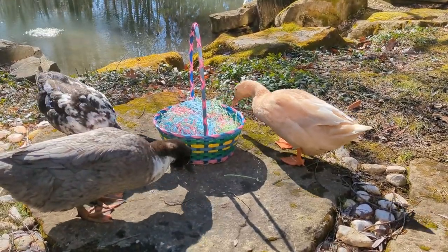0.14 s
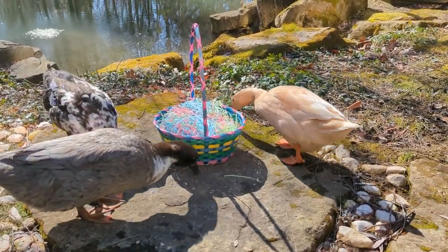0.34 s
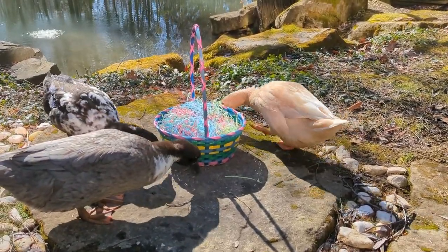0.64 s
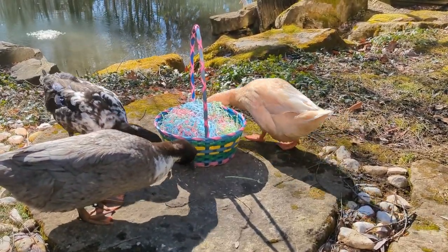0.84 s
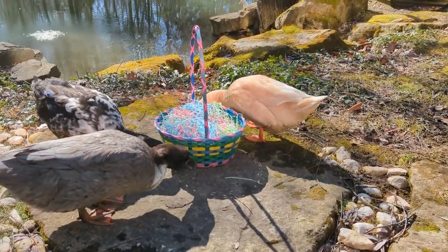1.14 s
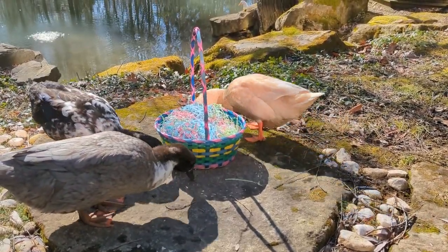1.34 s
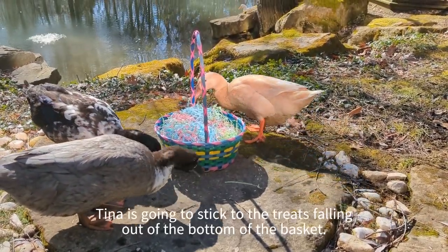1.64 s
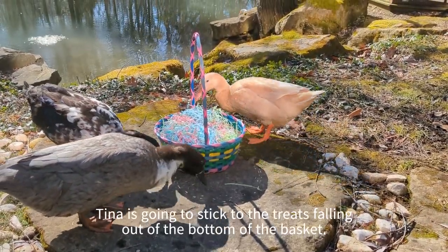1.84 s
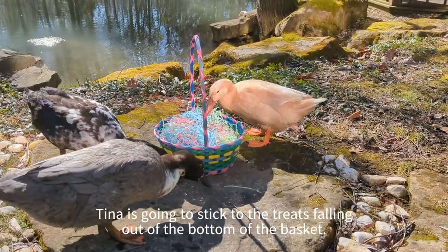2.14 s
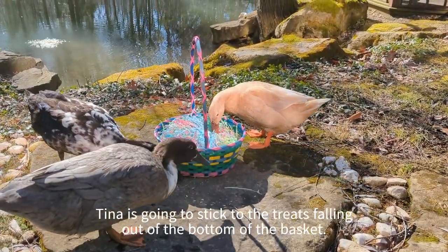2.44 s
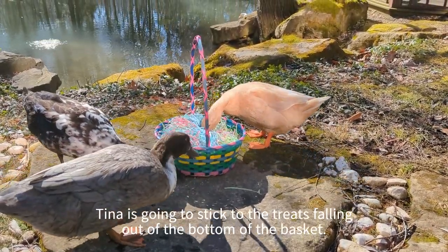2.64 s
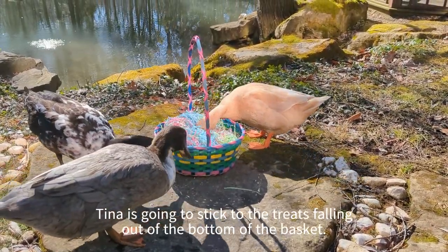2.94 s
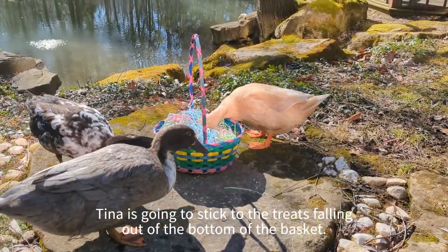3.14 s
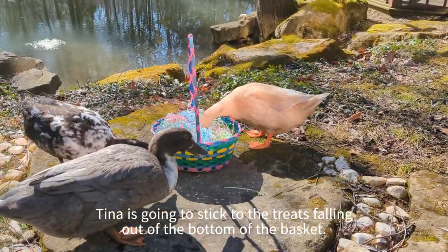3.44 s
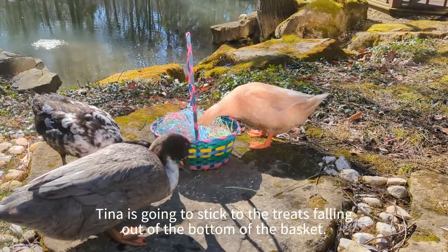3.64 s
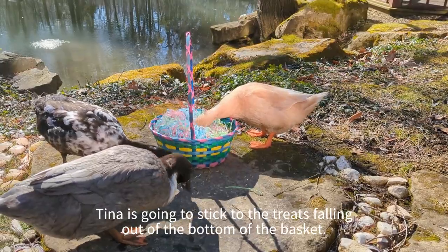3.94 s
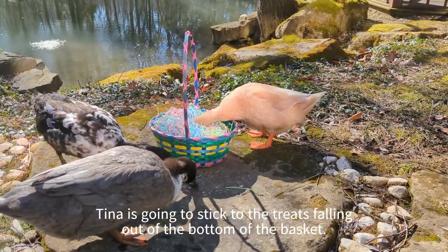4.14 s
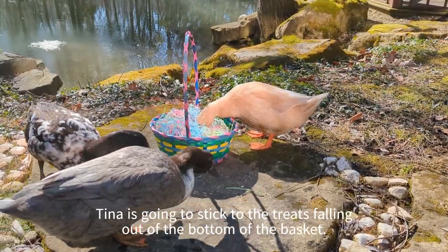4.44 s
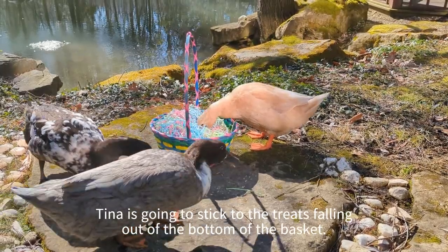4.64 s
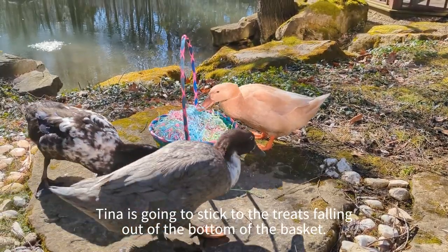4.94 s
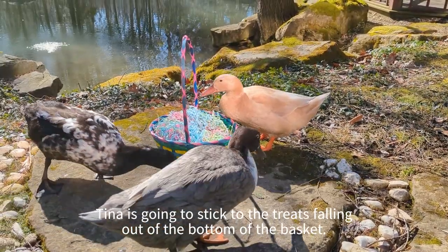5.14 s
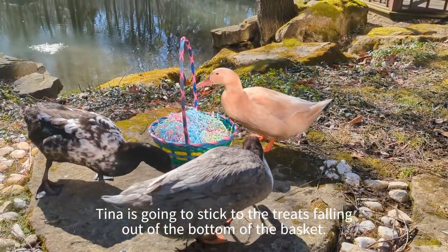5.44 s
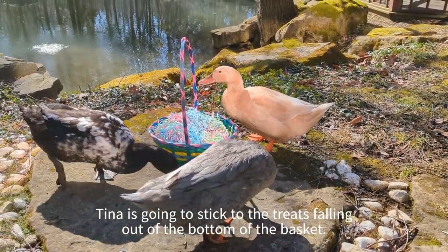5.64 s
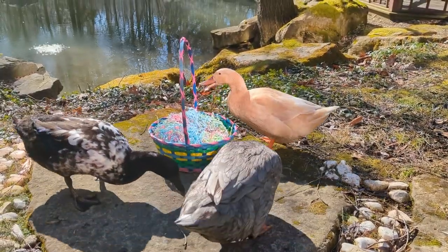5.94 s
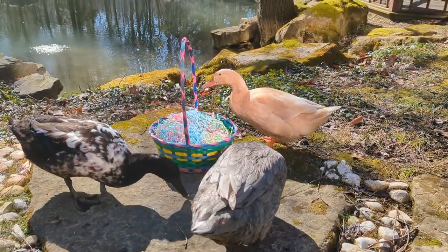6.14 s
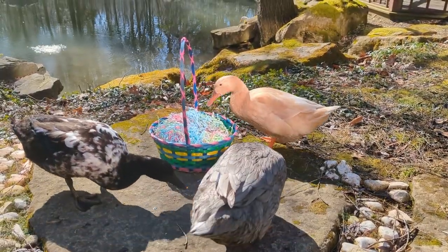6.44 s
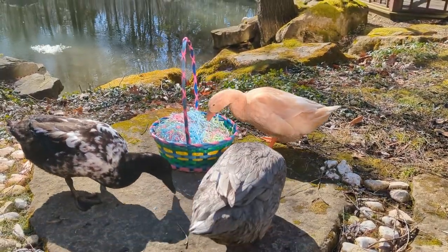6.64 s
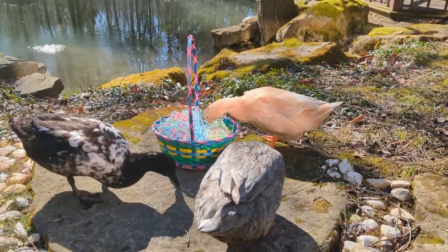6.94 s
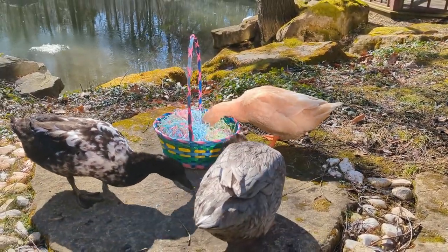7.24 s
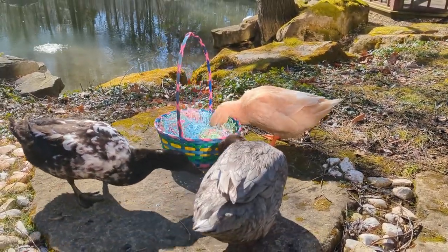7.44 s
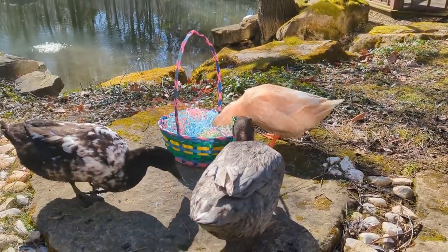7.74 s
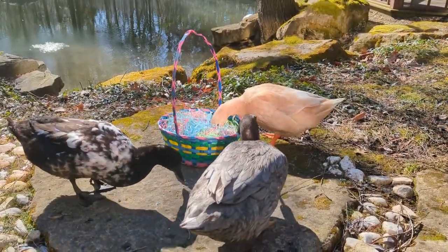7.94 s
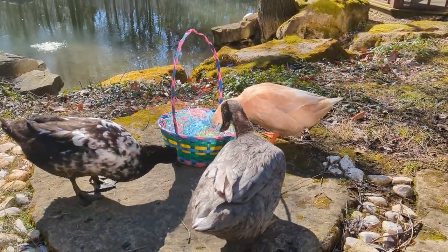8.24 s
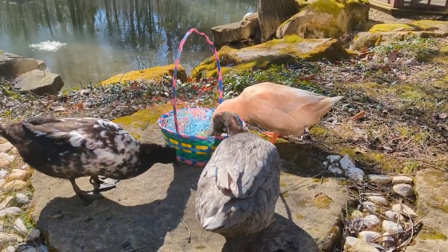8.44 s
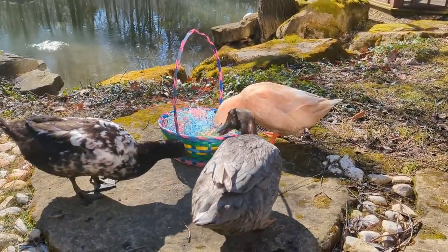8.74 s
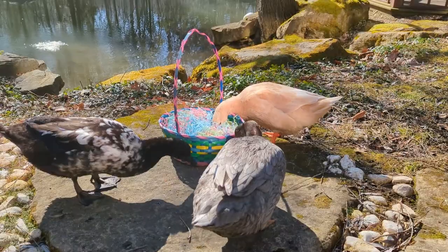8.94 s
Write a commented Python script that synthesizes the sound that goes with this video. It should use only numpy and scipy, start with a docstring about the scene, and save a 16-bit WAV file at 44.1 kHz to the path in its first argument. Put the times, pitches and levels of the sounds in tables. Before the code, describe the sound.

Dry, crackly rustle of plastic strands under nibbling duck bills, small taps, soft brief duck calls, and a distant engine drone outdoors.

```python
"""Shredded plastic grass rustles and snaps at once under the bills of three ducks feeding from a basket by a pond.
A far engine drones and a pump hums; bills tap basket and stone; a few soft peeps and quacks slip out.
Late on, something scuffs and knocks twice close to the right microphone port.
Friction and cracks are shaped noise with random slips; taps, calls and motors are sines with noise or wavering.
The two ports colour the treble differently: the right one favours 5 kHz, the left one 12 kHz."""
import sys
import numpy as np
from scipy import signal
from scipy.fft import rfft, irfft, next_fast_len
from scipy.io import wavfile
from scipy.ndimage import uniform_filter1d

SR = 44100
rng = np.random.default_rng(int(sys.argv[2]) if len(sys.argv) > 2 else 0)


def unload_wav(signal):
    """Save mono or channel-first audio to the path in sys.argv[1] as 16-bit WAV at rate SR, clipped to [-1, 1]."""
    wavfile.write(
        sys.argv[1],
        SR,
        np.round(np.clip(np.atleast_2d(signal).T, -1, 1) * 32767).astype(np.int16),
    )


N = 400869

# spectral weight of the rubbing strands: f/Hz, relative density level/dB
STRAND_SPECTRUM = [(410, -33), (700, 7), (1000, -18), (1140, -17), (1470, -1), (1770, -20), (1910, -13),
                   (3470, -11), (5020, -5), (5960, -17.5), (8190, -18), (9850, -22), (12200, -11),
                   (15900, -24.5), (16500, -47)]


def amp(db):
    """A level in dB is twenty times the logarithm of an amplitude ratio; this inverts it."""
    return 10 ** (np.asarray(db) / 20)


def rms_one(x):
    """Division by the root mean square brings a signal to unit effective value."""
    return x / np.sqrt(np.mean(x ** 2) + 1e-20)


def in_time(rows):
    """Linear interpolation turns rows of times and values into continuous courses."""
    s, *columns = np.transpose(rows)
    return [np.interp(np.arange(N) / SR, s, c) for c in columns]


def at_hz(points, hz):
    """A spectral level is interpolated along logarithmic frequency."""
    points = np.array(points)
    return np.interp(np.log(hz), np.log(points[:, 0]), points[:, 1])


def coloured(x, gain):
    """Linear filtering: the spectrum is multiplied by gain(Hz)."""
    size = next_fast_len(x.shape[-1])
    hz = np.arange(size // 2 + 1) * SR / size + 1
    return irfft(rfft(x, size) * gain(hz), size)[..., :x.shape[-1]]


def drift(rate):
    """Random modulation: noise low-passed around rate (Hz), with effective value 1."""
    step = 32   # samples between the computed points
    size = next_fast_len(N // step + 2)
    hz = np.arange(size // 2 + 1) * SR / step / size
    slow = irfft(rfft(rng.standard_normal(size)) / (1 + (hz / rate) ** 2), size)
    return np.interp(np.arange(N) / step, np.arange(size), rms_one(slow))


def fading(x, t60):
    """Exponential decay: each impulse rises suddenly and falls by 60 dB in t60 seconds."""
    return signal.lfilter([1], [1, -amp(-60 / (t60 * SR))], x + 1e-18)


def stereo_noise(alike):
    """Correlated noise: mid and side are mixed so that the two channels correlate by alike."""
    mid, side = rng.standard_normal((2, N))
    return np.sqrt((1 + alike) / 2) * mid + np.sqrt((1 - alike) / 2) * side * [[1], [-1]]


def crackle(per_s, spread_db, t60):
    """Stick-slip friction: an envelope of many small decaying slips of uneven size, with effective value 1."""
    sizes = amp(spread_db * np.minimum(rng.exponential(1, N), 3))
    slips = (rng.random(N) < per_s / SR) * sizes
    return rms_one(fading(slips, t60))


def bites():
    """Superposed power: each bill closing on the strands adds a rounded hump to the swell in dB."""
    # t/s, swell level/dB; values below zero add none
    bite_times = [(0.031, 12.5), (0.196, 19.5), (0.437, 5.5), (0.579, 7), (0.69, 7), (0.943, 14),
                  (1.044, 14.5), (1.13, 10), (1.362, 10), (1.654, 12), (1.731, 11), (1.852, 9), (1.946, 4),
                  (2.235, 7.5), (2.527, 7), (3.335, 1), (3.405, 2.5), (3.491, 5), (3.637, 6), (3.702, 8),
                  (3.789, 9.5), (3.834, 6.5), (3.939, 4), (4.304, 1), (4.421, -1), (4.654, 4.5), (4.714, 0),
                  (4.995, 10), (5.117, 6), (5.205, 7), (5.319, 12.5), (5.373, 6.5), (6.1, 9.5), (6.161, 10),
                  (6.404, 12), (6.68, 9), (6.758, 6.5), (6.853, 7), (7.039, 7), (7.195, 4.5), (7.321, 7.5),
                  (7.545, 6.5), (7.684, 6), (7.881, 6), (8.09, 7), (8.311, 8), (8.646, 10)]
    half_width_s = 0.012
    t = np.arange(0, N, 32) / SR
    power = 1
    for s, db in bite_times:
        power = power + (amp(2 * max(db, 0)) - 1) * np.exp(-((t - s) / half_width_s) ** 2)
    return np.interp(np.arange(N) / SR, t, 10 * np.log10(power))


def grains():
    """Narrow-band scratching: single strands scratch in clumps, each dealt to one of ten bands; effective value 1."""
    typical_per_s, clump_db, t60_s = 160, 8, 0.049
    born = rng.random(N) < typical_per_s * amp(clump_db * drift(7)) / SR
    ticks = born * amp(3.9 * np.minimum(rng.exponential(1, N), 3))
    dealt, white, out = rng.integers(0, 10, N), rng.standard_normal(N), 0
    for k, hz in enumerate(np.geomspace(2800, 5300, 10)):
        band = signal.butter(2, [hz / 1.035, hz * 1.035], "band", fs=SR, output="sos")
        out = out + signal.sosfilt(band, white * fading(ticks * (dealt == k), t60_s))
    return rms_one(out)


def stirring():
    """Friction noise: strands rub in uneven slips, a fine hiss above rustle and crunch that swell apart."""
    # t/s, fine hiss level/dB, level/dB of the low crunch, which drops out when the stirring is faint;
    # both before the swings
    stir_course = [(0.0, -57, -73), (0.38, -53.5, -102), (0.63, -58, -91.5), (2.17, -53, -76.5),
                   (2.63, -54.5, -86), (3.01, -46.5, -73.5), (3.21, -44.5, -61), (3.52, -44, -59),
                   (4.4, -42, -55), (4.58, -45, -61), (4.76, -49, -69), (4.98, -54.5, -84.5),
                   (5.49, -62, -108), (5.85, -60, -108), (6.86, -63, -100.5), (7.24, -50, -72),
                   (7.47, -44.5, -65), (7.74, -42.5, -54.5), (8.05, -49, -68.5), (9.09, -53, -77.5)]
    # bands below the hiss: lower f/Hz, upper f/Hz, share that follows the crunch,
    # gain level/dB, patchiness level/dB, depth of the bites (factor on their dB)
    stir_layers = [(2715, 3990, 0.34, -9.5, 7, 1.6), (1659, 2494, 1.25, -1, 3, 1.39),
                   (985, 1570, 1.555, -7.5, 10.5, 1.48)]
    nibble_s = .16   # bills work in short bouts: swings slower than this are evened out
    bout_db, sparse_bout_db_per_db = 0.77, 0.0219   # swing of the bouts; widens as the crunch thins out
    tick_share, sparse_tick_db_per_db = .22, 0.2872   # dry ticks stand out as the crunch thins out
    grain_db = -10.5   # scratches against the hiss
    hiss_db, crunch_db = in_time(stir_course)
    sparse_db = crunch_db.max() - crunch_db

    throb = drift(9.4)
    throb = np.minimum(rms_one(throb - uniform_filter1d(throb, int(nibble_s * SR))), 1.2)
    throb *= bout_db + sparse_bout_db_per_db * sparse_db

    fine = crackle(1200, 8.7, 0.069)
    ticks = tick_share * amp(sparse_tick_db_per_db * np.minimum(sparse_db, 28)) * crackle(90, 4.5, .011)
    slips = (fine + ticks) * stereo_noise(0.016)
    slips = coloured(slips, lambda hz: amp(at_hz(STRAND_SPECTRUM, hz)))

    hiss = signal.sosfilt(signal.butter(10, 4350, "high", fs=SR, output="sos"), slips)
    swell = bites()
    out = (rms_one(hiss) + amp(grain_db) * grains()) * amp(hiss_db + throb + swell)
    for low_hz, high_hz, share, gain_db, patchy_db, depth in stir_layers:
        edges = np.geomspace(low_hz, high_hz, 3)
        for band in zip(edges, edges[1:]):
            part = signal.sosfilt(signal.butter(3, band, "band", fs=SR, output="sos"), slips)
            level_db = gain_db + hiss_db + share * (crunch_db - hiss_db)
            patches = patchy_db * np.minimum(drift(12), .6)
            out += rms_one(part) * amp(level_db + throb + depth * swell + patches)
    return out


def background():
    """Stationary noise and tones: air hiss rises with the rumble, an engine drone wavers, a pump tone holds steady."""
    # far engine: t/s, mean drone f/Hz, drone level/dB before wavering, rumble level/dB
    engine_course = [(0.0, 120, -77.5, -78), (0.71, 113.6, -84.5, -95), (1.52, 113.4, -78, -79),
                     (3.42, 114.9, -84.5, -91), (4.93, 112.9, -71.5, -79.5), (8.58, 111.1, -71.5, -71),
                     (9.09, 111.4, -66.5, -68)]
    # open air: f/Hz, relative density level/dB
    air_spectrum = [(15, -44), (25, -56), (112, 5), (132, 4.5), (260, -4), (306, -4.5), (366, -6.5),
                    (466, -10.5), (592, -5), (784, -5), (1240, -10), (2220, -14.5), (3000, -28),
                    (3900, -22), (6600, -120)]
    air_db = -77   # when the rumble is at -79 dB
    pump_hz, pump_db = 360.4, -83.5
    hz, drone_db, rumble_db = in_time(engine_course)
    air = rms_one(coloured(stereo_noise(0.54), lambda f: amp(at_hz(air_spectrum, f))))
    air = amp(air_db + 0.42 * (rumble_db + 79)) * air
    turn = 2 * np.pi * np.cumsum(hz * (1 + .045 * drift(9))) / SR
    drone = np.sqrt(2) * amp(drone_db + 3 * drift(10)) * np.sin(turn)
    rumble = signal.sosfilt(signal.butter(3, [42, 85], "band", fs=SR, output="sos"), stereo_noise(0.97))
    pump = amp(pump_db) * np.sin(2 * np.pi * pump_hz * np.arange(N) / SR)
    return air + drone + amp(rumble_db) * rms_one(rumble) + pump


def crest(x):
    """Short-time level: the highest effective value within any 130 samples."""
    return np.sqrt(uniform_filter1d(x ** 2, size=130).max())


def snaps():
    """Impulsive excitation: a sharp crack amid a run of smaller ones drives a ringing body and an airy top."""
    # bill snaps among the strands: t/s, body crest level/dB, body f/Hz, airy top crest level/dB
    snap_events = [(0.0349, -46, 2920, -47), (0.0798, -43.5, 4580, -56), (0.1869, -35.5, 3440, -30.5),
                   (0.2897, -41.5, 4030, -47), (0.3188, -42.5, 3400, -42.5), (0.3457, -44.5, 4630, -40.5),
                   (0.382, -40.5, 4500, -47), (0.436, -46, 4830.0, -56), (0.5385, -50, 5450, -49),
                   (0.5852, -40, 4420, -53), (0.6884, -47.5, 3000, -45), (0.7858, -43.5, 4470.0, -50),
                   (0.9409, -43, 4470, -34), (0.9544, -38.5, 4540, -50), (1.0137, -40, 4650, -32),
                   (1.043, -44, 3520, -38), (1.1284, -46.5, 3480, -42.5), (1.2668, -51.0, 4440, -34.5),
                   (1.2883, -46.0, 3840.0, -47), (1.4769, -52, 4550, -38.0), (1.8378, -44, 4660.0, -61),
                   (1.8526, -53, 4460, -40.5), (1.9369, -45, 4400, -41), (2.367, -43.5, 5300, -50),
                   (2.5226, -39, 4480, -58), (2.533, -42.0, 4590.0, -46.0), (2.8136, -42.5, 3470, -58),
                   (2.85, -41.5, 5000, -56), (2.9488, -64, 4500.0, -39.5), (3.0137, -46.0, 3980.0, -40),
                   (3.1791, -38, 5100, -41), (3.7203, -36, 5180.0, -39), (3.7837, -37, 5320.0, -48),
                   (3.7927, -35, 5340, -54), (4.184, -30, 4940, -39), (4.3025, -38, 3870, -41),
                   (4.421, -30.5, 4750, -57), (4.987, -39.5, 4020, -50), (5.0011, -42, 4170, -57),
                   (5.183, -48.0, 3600, -68), (5.3253, -44.5, 3300, -62), (5.8722, -51.5, 3840, -56),
                   (6.0992, -49, 3400.0, -52), (6.158, -39.5, 4940, -66), (6.391, -51, 4670, -60),
                   (6.4041, -52, 3080, -59), (6.438, -48, 3290, -60.0), (6.6863, -48.5, 4640.0, -75),
                   (6.854, -51, 4710.0, -54), (7.681, -38.5, 4200.0, -39), (7.7732, -42, 4830, -51),
                   (8.3692, -44, 4170, -50), (8.5048, -49, 3050, -56), (8.5285, -44, 5100.0, -57),
                   (8.6449, -57, 4460, -52), (8.9073, -43.5, 4780, -37)]
    lead_s, rise_share = .012, .35   # room before the main crack; length of the swell against the decay
    cracks_per_s, crack_t60_s, run_t60_s = 900, 0.019, 0.087
    click, broad_share = 7.5, 0.2   # sharpness of the cracks; broad share of the body
    out, size = np.zeros((2, N)), int(.07 * SR)
    t = np.arange(size) / SR - lead_s
    broad = signal.butter(2, [2300, 5600], "band", fs=SR, output="sos")
    strength = 0.15 * amp(-60 * np.where(t < 0, -t / rise_share, t) / run_t60_s)
    for s, body_db, hz, top_db in snap_events:
        cracks = (rng.random(size) < cracks_per_s / SR) * rng.uniform(0.3, 1, size) * strength
        cracks[round(lead_s * SR)] = 1
        burst = fading(cracks, crack_t60_s) * rng.standard_normal((3, size)) + click * cracks
        narrow = signal.butter(1, [hz / 1.03, hz * 1.03], "band", fs=SR, output="sos")
        ring = signal.sosfilt(narrow, burst[0])
        body = rms_one(ring) + broad_share * rms_one(signal.sosfilt(broad, burst[0]))
        airy = burst[0] + .7 * burst[1:]   # partly different on each side
        top = coloured(airy, lambda f: amp(at_hz(STRAND_SPECTRUM, f)) * (f > 5600))
        at = round((s - lead_s - .001) * SR)
        out[:, at:at + size] += amp(body_db) * body / crest(body) + amp(top_db) * top / crest(top)
    return signal.sosfilt(signal.butter(4, 2400, "high", fs=SR, output="sos"), out)


def taps():
    """Damped resonance: a hollow ring with scratchy noise around its pitch; the shorter, the drier."""
    # taps on basket and stone: t/s, level/dB before the swell and scratch, f/Hz, decay by 60 dB t/s (8 ms at least)
    tap_events = [(0.036, -35, 1790, 0.016), (1.639, -55, 1860, 0.058), (2.083, -51, 1900, .03),
                  (2.218, -40, 1640, 0.019), (2.271, -51, 1530, 0.014), (2.363, -52, 1820, 0.038),
                  (4.706, -46.5, 1253, 0.044), (4.843, -55, 1140, 0.052), (6.402, -56.5, 960, 0.057),
                  (6.598, -50, 1690, 0.088), (6.641, -53.5, 1640, 0.16), (6.675, -52.5, 624, 0.057),
                  (8.302, -55.5, 1164, 0.11), (8.371, -47.5, 1170, 0.035), (8.385, -51, 1137, .06),
                  (8.895, -40.5, 1170, 0.051)]
    out, t = np.zeros(N), np.arange(int(.1 * SR)) / SR
    for s, peak_db, hz, t60 in tap_events:
        band = signal.butter(2, [hz / 1.15, hz * 1.3], "band", fs=SR)
        scratch = signal.lfilter(*band, rng.standard_normal(len(t)))
        ring = np.sin(2 * np.pi * hz * t) + min(.8, .025 / t60) * rms_one(scratch)
        swell = np.sin(np.pi / 2 * np.minimum(t / t60 / .1, 1)) ** 2
        envelope = amp(peak_db - 60 * t / max(t60, .008)) * swell
        out[round((s - .002) * SR):][:len(t)] += envelope * ring
    return out


def arch(s, start, top, end):
    """Normalised time: how far each moment lies before and after the top, 0 to 1."""
    return np.clip((top - s) / (top - start), 0, 1), np.clip((s - top) / (end - top), 0, 1)


def calls():
    """Source and filter: a gliding fundamental, with hoarse overtones weighted by the throat resonances."""
    # throat resonances: f/Hz, relative level/dB
    throat_spectrum = [(400, -17), (600, -10), (850, -26), (1100, -5.5), (1350, 8), (1600, -6), (1800, -46),
                       (2050, -14), (2600, -39), (3500, -10.5), (4500, -38)]
    # start t/s, highest pitch t/s, loudest t/s, end t/s, first f/Hz, highest f/Hz, last f/Hz,
    # fundamental level/dB, overtones level/dB before hoarseness, throat pitch ratio
    voice_events = [(.075, .126, .128, .168, 560, 678, 580, -61, -67, 1.28),
                    (5.18, 5.255, 5.228, 5.285, 490, 735, 600, -65, -80, 1.0),
                    (5.338, 5.364, 5.367, 5.425, 265, 325, 270, -57, -45, 1.12),
                    (5.468, 5.514, 5.5, 5.54, 560, 685, 560, -71, -65, 1.08),
                    (5.622, 5.652, 5.68, 5.735, 275, 313, 222, -44, -44.5, .95)]
    edge_db, rise_shape, fall_shape = -32, 2.2, 1.5   # level at both ends; roundness of swell and fade
    peep_tilt_db = 15   # peeps lose this much per overtone above the third harmonic
    sag_shape = 2.2   # how early the pitch sags
    out, hoarse, jitter = np.zeros(N), .8 * drift(220), drift(200)
    for start, top, loudest, end, first_hz, top_hz, last_hz, low_db, high_db, throat in voice_events:
        at = np.arange(round(start * SR), round(end * SR))
        quack = top_hz < 400   # low calls turn hoarse; peeps are slightly breathy, with few overtones
        before, after = arch(at / SR, start, top, end)
        sag = np.sin(np.pi / 2 * np.minimum(sag_shape * after, 1)) ** 2
        hz = top_hz - (top_hz - first_hz) * before - (top_hz - last_hz) * sag
        rasp = .3 + quack * .9 * sag   # every call is a little breathy; a quack turns hoarse as it sags
        turn = 2 * np.pi * np.cumsum(hz * (1 + .04 * rasp * jitter[at])) / SR

        gains, over = [], 0
        for k in range(2, 20):
            tilt_db = 0 if quack else peep_tilt_db * max(k - 3, 0)
            gain = amp(at_hz(throat_spectrum, k * hz / throat) - tilt_db)
            gains.append(gain)
            over = over + gain * np.cos(k * turn + 0.153 * (k - 2) ** 2)
        over = over / np.sqrt(np.sum(np.square(gains), 0))

        before, after = arch(at / SR, start, loudest, end)
        effort = amp(edge_db * (before ** rise_shape + after ** fall_shape))
        effort = effort if quack else effort ** 0.52   # peeps hold their level
        # a quack's fundamental comes in late; its overtones start strong, then both fade about alike
        low_course = amp(-22 * before - 8 * after) if quack else 1
        high_course = amp(11 * before - 7 * after) if quack else 1
        low = amp(low_db) * low_course * np.cos(turn)
        high = amp(high_db) * high_course * over * (1 + rasp * hoarse[at])
        out[at] += np.sqrt(2) * signal.windows.tukey(len(at), .4) * effort * (low + high)
    return out


def stone_echoes(x):
    """Early reflections: many faint dull echoes from the rocks around, other ones on each side."""
    lags = (rng.uniform(0.005, 0.026, (2, 14)) * SR).astype(int)
    rocks = np.zeros((2, 4096))
    rocks[[[0], [1]], lags] = amp(-21 - 300 * lags / SR)
    dull = signal.lfilter([.3], [1, -.7], x)
    return signal.oaconvolve(dull[None], rocks, axes=1)[:, :N]


def bumps():
    """Near-field pressure pulses: two dry knocks, each with a low wave that falls in pitch, and a rubbing scuff."""
    # knocks: t/s, push level/dB before its decay and filter, sharpness (decay rate in 1/s), relative low wave level/dB
    knock_events = [(7.737, -17, 1770, -28), (7.825, -17, 1790, -12.5)]
    wave_hz, wave_drop_hz, wave_drop_s = 65, 520, .0028   # the low wave falls quickly to its pitch
    scuff_from_s, scuff_to_s, scuff_edge_s, scuff_db = 7.695, 7.97, .05, -55   # level before wavering
    out, t = np.zeros(N), np.arange(int(.15 * SR)) / SR
    for s, peak_db, sharpness, wave_db in knock_events:
        push = np.exp(-t * sharpness) * np.sin(2 * np.pi * sharpness * t * .85)
        push = signal.lfilter(*signal.butter(2, 450, "high", fs=SR), push)
        turn = 2 * np.pi * np.cumsum(wave_hz + wave_drop_hz * np.exp(-t / wave_drop_s)) / SR
        wave = amp(wave_db) * np.exp(-t / 0.0074) * np.sin(turn)
        out[round(s * SR):][:len(t)] -= amp(peak_db) * (push - wave)
    rub = signal.sosfilt(signal.butter(2, [250, 1500], "band", fs=SR, output="sos"), rng.standard_normal(N))
    corners = [scuff_from_s, scuff_from_s + scuff_edge_s, scuff_to_s - 2 * scuff_edge_s, scuff_to_s]
    held = np.interp(np.arange(N) / SR, corners, [0, 1, 1, 0])
    return out + rms_one(rub) * held * amp(scuff_db + 0.67 * drift(39))


def scene():
    """Superposition: the ducks reach the left port later, the knocks and scuff barely reach it."""
    left_lag, near_left_db = 7, -30   # samples; dB
    near = calls() + taps()
    ducks = stirring() + snaps() + near + stone_echoes(near)
    ducks[0] = np.roll(ducks[0], left_lag)
    return ducks + bumps() * amp([[near_left_db], [0]]) + background()


def record(dry):
    """Power sharing: each port takes its share in every band; a low-pass cuts the top."""
    # f/Hz, left minus right port level/dB
    port_balance = [(140, -1), (400, 1), (1170, -3), (1900, -3), (2700, -10), (3500, -28), (4400, -27),
                    (5000, -23), (6400, -6), (8500, -1), (10500, 2.5), (12000, 7), (14000, 17),
                    (15500, -13)]
    cutoff_hz = 16600

    def shares(hz):
        left = amp(at_hz(port_balance, hz))
        return np.sqrt(2 / (1 + left ** 2)) * np.array([left, np.ones_like(left)])
    low_pass = signal.cheby2(12, 60, cutoff_hz, fs=SR, output="sos")
    return signal.sosfilt(low_pass, coloured(dry, shares))


dry = scene()
out = record(dry)
unload_wav(out)
```